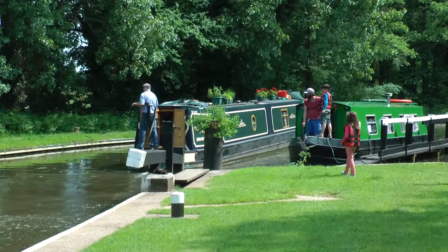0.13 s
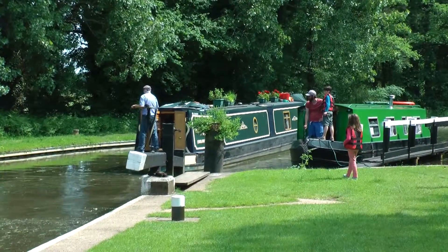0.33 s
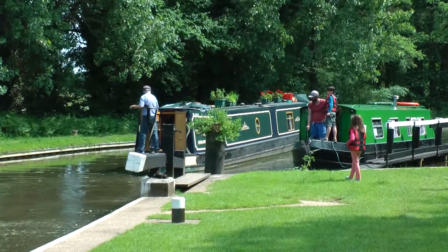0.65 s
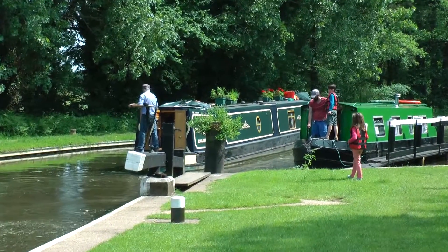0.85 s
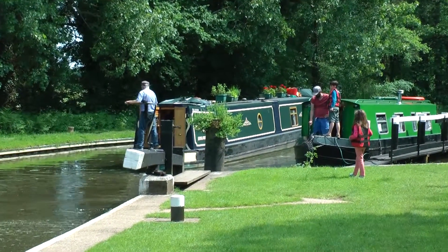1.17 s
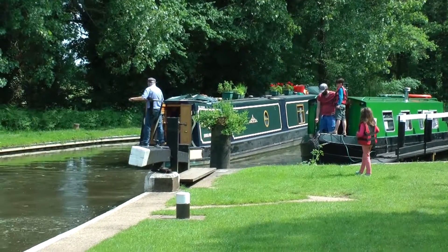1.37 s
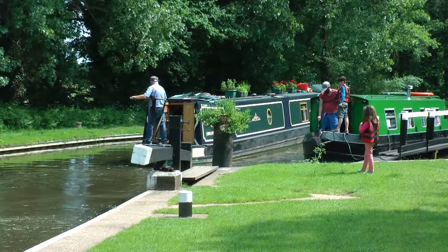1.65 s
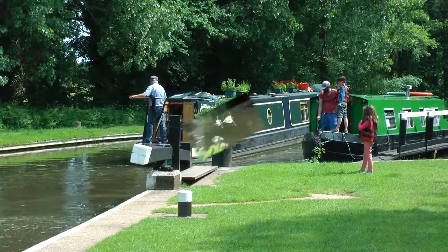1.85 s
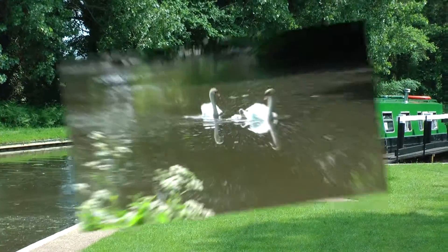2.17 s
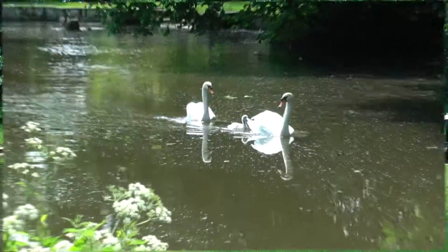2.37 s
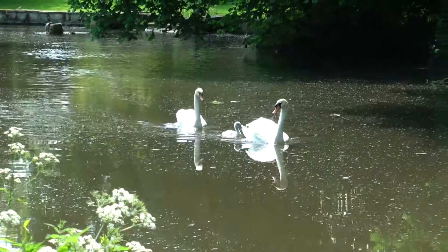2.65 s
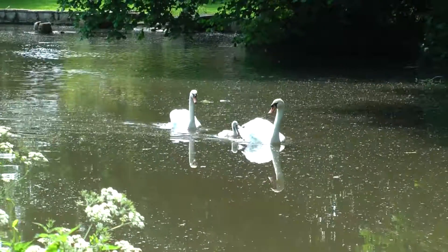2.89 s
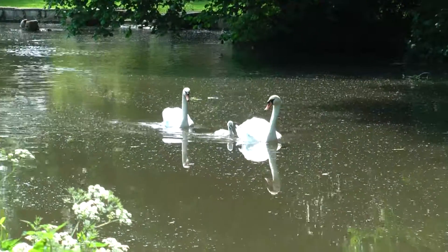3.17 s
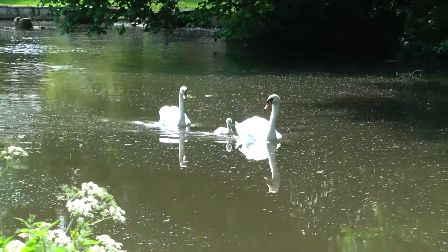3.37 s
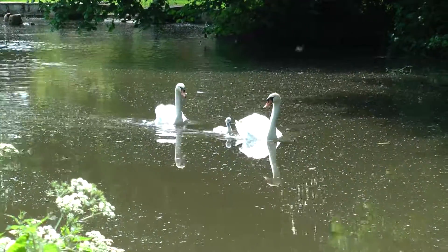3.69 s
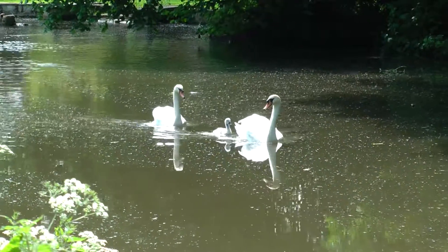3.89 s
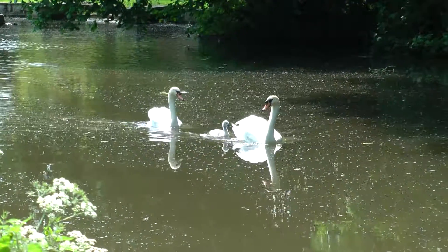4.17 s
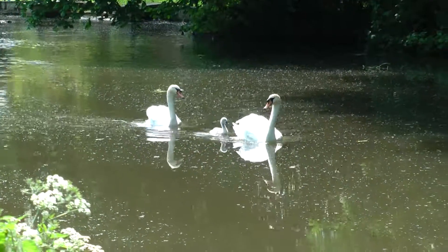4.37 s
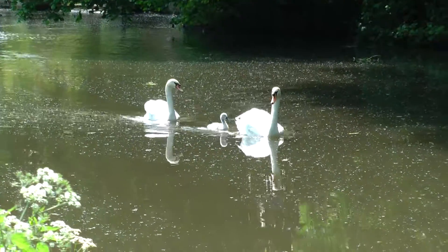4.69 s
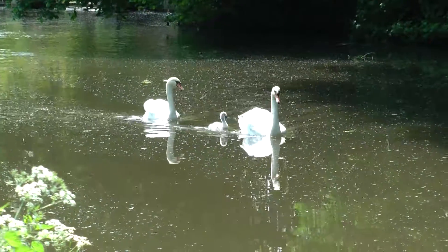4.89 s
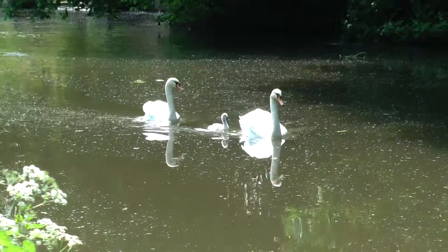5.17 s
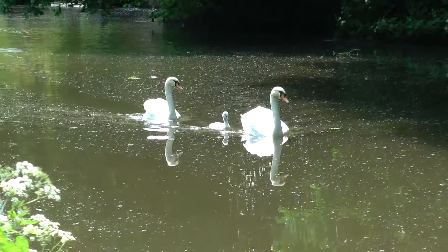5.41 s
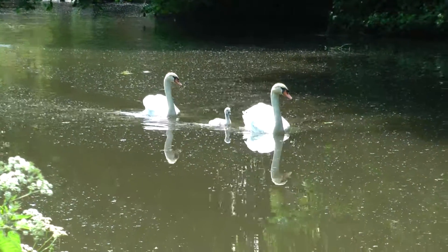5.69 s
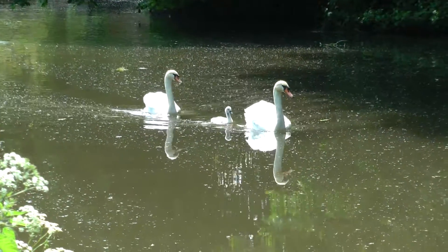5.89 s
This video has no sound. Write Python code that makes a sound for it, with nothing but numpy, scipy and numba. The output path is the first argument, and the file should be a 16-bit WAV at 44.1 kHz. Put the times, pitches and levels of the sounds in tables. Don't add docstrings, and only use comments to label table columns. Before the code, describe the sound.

From a canal towpath, lock water pours loudly and steadily, with bubbling froth, small gulps and barely audible thin bird seeps. After about a second and a half it fades smoothly into a much quieter wooded reach with low distant rumble and leafy haze. Far birds chirp and slur among the trees, a twig cracks softly, and a nearer thrush whistles at the end. Stereo outdoor camera sound, slightly thinned in the faint treble.

```python
import sys
import numpy as np
from scipy import signal
from scipy.fft import rfft, irfft, next_fast_len
from scipy.io import wavfile
from scipy.ndimage import uniform_filter1d
from numba import njit

SR = 44100
rng = np.random.default_rng(int(sys.argv[2]) if len(sys.argv) > 2 else 0)


def volts_from_db(level):
    exponent = np.asarray(level, float) / 20
    return 10 ** exponent


def output_pcm(signal):
    pcm = np.clip(np.atleast_2d(signal).T, -1, 1) * 32767
    wavfile.write(sys.argv[1], SR, np.round(pcm).astype(np.int16))


N = 266805

FADE_S = (1.573, 2.498)
HIGH_BOW = 0.0072


def over_hz(table, hz):
    f, v = np.transpose(table)
    return np.interp(np.log(hz + 1), np.log(f), v)


def faded():
    return np.clip((np.arange(N) / SR - FADE_S[0]) / (FADE_S[1] - FADE_S[0]), 0, 1)


def walk(rate):
    k = int(SR / rate)
    held = np.repeat(rng.standard_normal(N // k + 1), k)
    return 1.3 * uniform_filter1d(uniform_filter1d(held, k), k)[:N]


def rush(source, colour, side, pan, swell_db, flicker_db, lift):
    size = next_fast_len(N)
    hz = np.fft.rfftfreq(size, 1 / SR)
    mid, wide = rfft(source, size) * volts_from_db(over_hz(colour, hz))
    wide = wide * volts_from_db(over_hz(side, hz))
    ears = np.array([mid + wide, mid - wide])
    ears = ears * volts_from_db(np.outer([.5, -.5], over_hz(pan, hz)))
    out = 0
    swell = swell_db * walk(1.6)
    for half_octave in np.arange(9, 29):
        share = np.clip(1 - abs(2 * np.log2(hz + 1) - half_octave), 0, 1)
        band = irfft(ears * share, size)[:, :N]
        out = out + band * volts_from_db(swell + flicker_db * walk(9) + lift(2 ** (half_octave / 2)))
    return out


@njit
def bubbles(start, hz, cycles, size, glide, length):
    out = np.zeros(length)
    for k in range(len(start)):
        phase = 0.
        span = cycles[k] * SR / hz[k]
        for i in range(min(int(3 * span), length - start[k])):
            phase += 2 * np.pi * hz[k] * (1 + glide * i / span) / SR
            out[start[k] + i] += size[k] * np.exp(-2 * i / span) * np.sin(phase)
    return out


def froth(count, spread_db, cycles, share):
    when, pitch, big = rng.random((count, 3)).T
    hz = 150 * 70 ** pitch
    size = volts_from_db(-spread_db * np.log(1.003 - big)) * hz / 1000
    start = (when * 2.5 * SR).astype(np.int64)
    cloud = bubbles(start, hz, cycles + 0 * hz, size, 0.11, N)
    cloud = cloud / np.std(cloud[:2 * SR])
    share = np.clip(share, 0, 1)
    return np.sqrt(share) * cloud + np.sqrt(1 - share) * rng.standard_normal(N)


def gulps():
    # (time [s], pitch [Hz], level [dB], length [s])
    big_bubbles = [
        (0.236, 606, -25, .03),
        (0.547, 323, -29.5, 0.048),
        (0.608, 637, -25.5, 0.027),
        (0.851, 309, -30, 0.051),
        (0.898, 322.5, -29, 0.073),
        (1.718, 935, -20, 0.015),
    ]
    out = np.zeros(N)
    for s, hz, db, length in big_bubbles:
        u = np.arange(int(length * SR)) / (length * SR)
        at = int(s * SR)
        ring = np.sin(2 * np.pi * hz * length * (u + 0.037 * u ** 2))
        out[at:at + len(u)] += volts_from_db(db) * np.sin(np.pi * u) * ring
    return out


def lock():
    # (frequency [Hz], density [dB per Hz])
    water_colour = [(15, -55), (25, -16), (60, -11.5), (101, -3), (211, 1), (407, -4.5), (851, -3),
                    (2440, -15), (4130, -16.5), (6630, -22.5), (7400, -22.5), (8410, -25), (12200, -29),
                    (13500, -43)]
    # (frequency [Hz], side over mid [dB])
    water_side = [(60, -19.5), (110, -14), (200, -19.5), (370, -14.5), (670, -10.5), (1230, -6.5),
                  (2250, -4), (4110, -9), (7520, -5), (13800, 5)]
    # (frequency [Hz], left over right [dB])
    water_pan = [(60, -1.5), (110, 0), (200, 0), (370, -0.5), (670, -0.5), (1230, -3), (2250, -5),
                 (4110, -3.5), (7520, -2), (13800, 7.5)]
    boom_sag, spray_sag = -1, -0.03
    flow_db, flow_sag, surge_db = -26, -0.18, .35
    t = np.arange(N) / SR

    def lift(hz):
        return t * (boom_sag * (hz < 350) + spray_sag * (hz > 1700))

    source = np.array([froth(count=14000, spread_db=2.0, cycles=9.1, share=0.23) for _ in range(2)])
    pour = rush(source, water_colour, water_side, water_pan, swell_db=.25, flicker_db=.9, lift=lift)
    pour = pour / np.std(pour[:, :2 * SR])
    pour = pour * volts_from_db(flow_db + flow_sag * t + surge_db * walk(6))
    return pour * np.cos(np.pi / 2 * faded()) ** 2.01 + gulps()


def add(track, s, hz, parts, edge, rough):
    u = np.linspace(0, 1, len(hz))
    waver, flutter = uniform_filter1d(rng.standard_normal((2, len(hz))), size=150, axis=1)
    phase = 2 * np.pi * np.cumsum(hz * (1 + rough * waver)) / SR
    tone = sum(np.sqrt(2) * volts_from_db(db) * np.sin(k * phase) for k, db in parts)
    flutter_db = 3.5 * min(rough / .2, 1)
    tone = tone * volts_from_db(flutter_db * 12 * flutter)
    at = int(s * SR)
    track[at:at + len(u)] += (tone * np.clip(np.minimum(u, 1 - u) / edge, 0, 1))[:N - at]


def far(notes, rough, bow):
    track = np.zeros(N)
    for s, length, first, last, db in notes:
        u = np.linspace(-1, 1, int(length * SR))
        hz = (first + last) / 2 * (1 + bow * (1 - u ** 2)) + u * (last - first) / 2
        add(track, s, hz, [(0.98, db)], .25, rough)
    return track


def trees(track, pan_db, wet_db, t60, alike):
    t = np.arange(int(.9 * SR)) / SR
    decay = np.exp(-np.log(1000) * t / t60) * np.minimum(t / 0.0011, 1)
    mid, side = rng.standard_normal((2, len(t))) * decay
    alike = np.clip(alike, 0, 1)
    tail = np.sqrt(1 + alike) * mid + np.sqrt(1 - alike) * np.outer([1, -1], side)
    tail = tail * volts_from_db(wet_db) / np.sqrt(np.mean(np.sum(tail ** 2, axis=1)))
    direct = np.outer(volts_from_db(np.array([pan_db, -pan_db]) / 2), track)
    return direct + signal.fftconvolve(track[None], tail, axes=1)[:, :N]


def high_notes():
    # (time [s], length [s], level [dB])
    thin_seeps = [
        (1.03, .12, -49.5),
        (1.18, .1, -50),
        (1.32, .14, -50.5),
    ]
    # (time [s], length [s], first pitch [Hz], last pitch [Hz], level [dB])
    far_high = [(2.48, 0.045, 6840, 6700, -75), (2.8, 0.035, 7000, 6900, -69),
                (3.19, .049, 5650, 5660, -70), (3.28, 0.042, 6920, 6500, -63),
                (3.41, .046, 6600, 6600, -69), (3.61, 0.071, 7070, 6750, -69),
                (3.83, 0.13, 7560, 7000, -67.5), (4.36, 0.05, 8100, 7400, -53),
                (4.42, .04, 8070, 8650, -58), (4.57, 0.16, 6690, 6690, -57.5),
                (5.21, 0.074, 6000, 6980, -55.5), (5.67, 0.022, 7300, 8000, -55),
                (5.97, .08, 7300, 7400, -60)]
    # (time [s], length [s], first pitch [Hz], last pitch [Hz], level [dB])
    trilled = [
        (2.94, 0.068, 8170, 7950, -56),
        (3.39, 0.058, 7840, 7880, -54),
        (2.99, 0.047, 8700, 9340, -65.5),
        (3.43, 0.056, 8500, 9260, -65.5),
        (5.725, 0.048, 2950, 2980, -49.5),
        (5.725, 0.036, 5820, 6270, -47.5),
    ]
    seeps = [(s, length, 7280, 7100, db) for s, length, db in thin_seeps]
    return far(far_high + seeps, 0.06, HIGH_BOW) + far(trilled, 0.45, 0.016)


def reach():
    # (frequency [Hz], density [dB per Hz])
    reach_colour = [(15, -57), (25, -29.5), (92, 3), (394, -4), (494, -12), (737, -8.5), (901, -17.5),
                    (1560, -27.5), (2110, -28), (4710, -31), (5600, -34.5), (6870, -26.5), (7700, -31.5),
                    (13000, -39.5)]
    # (frequency [Hz], side over mid [dB])
    reach_side = [(60, -25), (110, -20.5), (200, -20), (370, -15), (670, -11.5), (1230, -4.5), (2250, 0.5),
                  (4110, -4), (7520, -11), (13800, -25)]
    hush_db, rise_db_per_s = -46.5, .5
    since = np.maximum(np.arange(N) / SR - FADE_S[1], 0)

    def lift(hz):
        return 10.5 * (since / since[-1]) ** 3.3 * (hz > 2500)

    source = rng.standard_normal((2, N))
    hush = rush(source, reach_colour, reach_side, [(60, .2), (9000, .3)], swell_db=.3, flicker_db=1.1, lift=lift)
    hush = hush / np.sqrt(np.mean(hush ** 2))
    return hush * volts_from_db(hush_db + rise_db_per_s * since) * faded()


def chorus(count, db, rise_db):
    when, length, pitch, slur, size = rng.random((count, 5)).T
    hz = 2000 * 3.3 ** pitch
    bend = .4 * (slur - .55) * hz
    loud = db + 8 * size + rise_db * when ** 2
    return far(zip(2.2 + 3.75 * when, 0.0139 + .05 * length, hz - bend, hz + bend, loud), .15, 0)


def warbler():
    # (time [s], length [s], first pitch [Hz], last pitch [Hz], level [dB])
    free_notes = [
        (2.55, 0.024, 4360, 4860, -59.5),
        (3.29, 0.046, 4660, 4450, -63.5),
        (3.53, 0.052, 4950, 5220, -60),
        (3.61, 0.029, 4310, 4250, -58),
        (3.66, .2, 4250, 4230, -77),
        (4.395, 0.058, 4700, 4560, -50.5),
        (4.4, 0.12, 4550, 3170, -62.5),
        (5.66, 0.081, 7420, 10000, -56),
    ]
    # (time [s], level [dB])
    flicks_up = [(2.74, -66), (2.901, -71), (3.17, -66), (3.852, -57.5), (5.141, -66), (5.3, -56),
                 (5.49, -56.5), (5.849, -51.5)]
    flicks_down = [(5.392, -55.5), (5.581, -53.5), (5.77, -54), (5.95, -52.5)]
    long_falls = [(3.7, -67), (3.88, -66), (4.05, -66), (4.22, -66)]
    # (length [s], first pitch [Hz], last pitch [Hz])
    stock = [((.03, 3600, 4900), flicks_up), ((.04, 5600, 3750), flicks_down), ((.075, 6700, 4300), long_falls)]
    slurs = [(s, *shape, db) for shape, sung in stock for s, db in sung]
    return far(slurs, 0.24, 0.0288) + far(free_notes, 0.14, HIGH_BOW)


def far_thrush():
    # (time [s], length [s], first pitch [Hz], last pitch [Hz], level [dB])
    distant_flutes = [(2.57, 0.018, 1965, 3000, -56), (2.61, 0.016, 2880, 2000, -55),
                      (3.02, 0.036, 2030, 1900, -64), (3.08, .063, 1710, 1750, -67),
                      (3.09, 0.041, 2510, 2350, -62.5), (3.15, .04, 3180, 3020, -63),
                      (3.33, 0.056, 2290, 1920, -56.5), (3.43, 0.07, 3700, 2290, -66),
                      (3.63, 0.013, 3700, 3250, -62), (3.705, 0.034, 2160, 1930, -56.5),
                      (3.78, 0.1, 1750, 1984, -63.5), (3.91, 0.095, 2008, 1988, -57.5),
                      (4.07, 0.062, 2000, 2230, -56.5), (4.14, 0.023, 3280, 4010, -55),
                      (4.22, 0.025, 3550, 4190, -54.5), (4.32, 0.074, 2510, 2200, -54),
                      (4.51, 0.079, 2224, 2000, -61), (4.65, 0.1, 1865, 2064, -56.5),
                      (4.82, .14, 1849, 1778, -56.5), (5.06, 0.073, 1930, 2280, -59),
                      (5.11, 0.14, 2620, 1987, -59.5)]
    return far(distant_flutes, 0.07, 0.0063)


def twig():
    snap_s, snap_db = 3.6, -41
    out = np.zeros(N)
    t = np.arange(1500) / SR
    band = signal.butter(2, [1200, 8000], "band", fs=SR)
    crack = signal.lfilter(*band, rng.standard_normal(len(t)))
    out[int(snap_s * SR):][:len(t)] = volts_from_db(snap_db) * crack * np.exp(-t / 0.01)
    return out


def arcs():
    # (time [s], length [s], first pitch [Hz], top pitch [Hz], level [dB])
    arched = [
        (4.624, 0.21, 8120, 8700, -54),
        (4.977, 0.17, 7720, 8500, -53.5),
        (5.283, 0.13, 8290, 9530, -47.5),
        (5.296, 0.17, 7200, 8200, -53.5),
        (5.574, .115, 8250, 9270, -42),
        (5.877, .11, 8150, 9070, -40),
    ]
    top_at = .7
    fall_per_s, fade_db = .85, -5
    track = np.zeros(N)
    for s, length, first_hz, top_hz, db in arched:
        u = np.linspace(0, 1, int(length * SR))
        climb = np.sin(np.pi / 2 * np.minimum(u / top_at, 1))
        fall = fall_per_s * length * (np.maximum(u - top_at, 0) / (1 - top_at)) ** 2
        hz = first_hz + (top_hz - first_hz) * climb - top_hz * fall
        add(track, s, hz, [(0.97, db + fade_db * u ** 2)], .07, .04)
    return track


def near_thrush():
    # (time [s], pitch [Hz], level [dB])
    thrush_curves = [
        [(5.26, 1696, -60), (5.292, 1730, -49.5), (5.364, 1765, -46), (5.406, 1722, -50), (5.43, 1670, -62)],
        [(5.49, 1750, -60), (5.505, 1813, -46), (5.53, 1820, -64), (5.555, 1832, -48.5), (5.6, 1795, -40),
         (5.635, 1710, -67)],
        [(5.655, 2460, -49), (5.671, 2480, -36), (5.739, 2955, -43.5), (5.77, 2916, -57)],
        [(5.85, 2336, -41.5), (5.882, 2416, -36), (5.946, 2253, -34.5), (5.972, 1930, -36), (5.982, 2029, -31),
         (6.05, 1998, -44)],
    ]
    octaves = [-35, -23, -8.5, -26.5]
    beak_hz, beak_width_hz, beak_db = 11500, 2200, -20.5
    track = np.zeros(N)
    for note, octave_db in zip(thrush_curves, octaves):
        s, *columns = np.transpose(note)
        hz, db = (np.interp(np.arange(s[0], s[-1], 1 / SR), s, c) for c in columns)
        top = [(k, db + beak_db - 6 * ((k * hz - beak_hz) / beak_width_hz) ** 2) for k in range(4, 8)]
        add(track, s[0], hz, [(1, db), (2, db + octave_db)] + top, .06, .04)
    return track


def scene():
    birds = trees(high_notes(), pan_db=0.99, wet_db=0.93, t60=0.75, alike=0.77)
    birds += trees(chorus(count=260, db=-78, rise_db=8.5), pan_db=.1, wet_db=4.4, t60=0.41, alike=0.85)
    birds += trees(warbler(), pan_db=.3, wet_db=6, t60=.6, alike=.6)
    birds += trees(far_thrush(), pan_db=-.5, wet_db=2, t60=.9, alike=0.37)
    birds += trees(arcs(), pan_db=-.5, wet_db=1.1, t60=0.46, alike=0.84)
    birds += trees(near_thrush(), pan_db=-5.5, wet_db=-0.37, t60=0.37, alike=0.52)
    return lock() + reach() + birds + trees(twig(), pan_db=.1, wet_db=1.7, t60=0.63, alike=0.42)


def starve(x, follow, near_db, wide_db, whim_db):
    # (frequency [Hz], threshold under the loudness [dB])
    kept_above = [(300, -62), (1300, -55), (3000, -50), (5500, -44.5), (7000, -41.5), (8400, -34),
                  (13000, -31.5)]
    hz, _, cells = signal.stft(x, SR, "cosine", 2048)
    power = abs(cells) ** 2
    both = power.mean(axis=0)
    loud = uniform_filter1d(np.where(hz < 1500, 1, .3) @ both, size=5)
    loud_db = 10 * np.log10(loud + 1e-12) + 28
    limit = volts_from_db(2 * (follow * loud_db - 29.5 + over_hz(kept_above, hz)[:, None]))
    limit = limit + volts_from_db(2 * near_db) * uniform_filter1d(both, size=70, axis=0)
    treble = uniform_filter1d(both * (hz[:, None] > 1500), size=260, axis=0)
    limit = limit + volts_from_db(2 * wide_db) * treble * (hz[:, None] > 1150)
    whim = rng.standard_normal((3, len(hz) // 12 + 1, power.shape[2]))
    whim = whim + .45 * rng.standard_normal(power.shape[2])
    whim = .4 * whim[:2] + .92 * whim[2]
    whim = np.repeat(uniform_filter1d(whim, size=2, axis=2), 12, axis=1)[:, :len(hz)]
    kept = cells * (uniform_filter1d(power, size=3, axis=1) > limit * volts_from_db(2 * whim_db * whim))
    return signal.istft(kept, SR, "cosine", 2048)[1][:, :N]


def top_cut(x):
    return signal.sosfilt(signal.butter(12, 14360, fs=SR, output="sos"), x)


def record(dry):
    thin = starve(dry, follow=.97, near_db=-18, wide_db=-16, whim_db=3.6)
    return top_cut(thin)


dry = scene()
out = record(dry)
output_pcm(out)
```